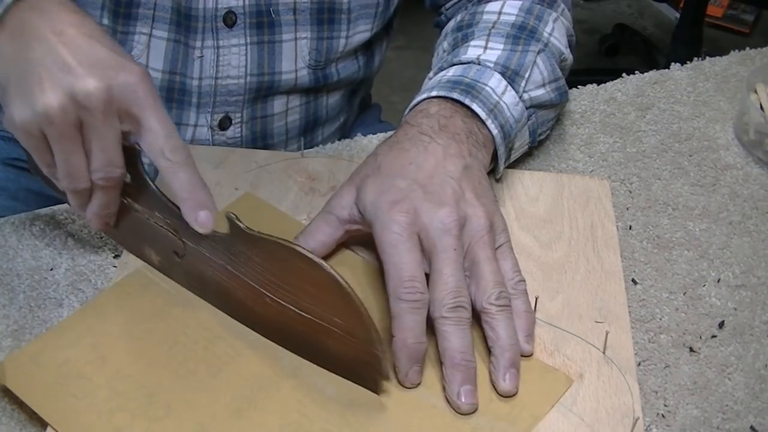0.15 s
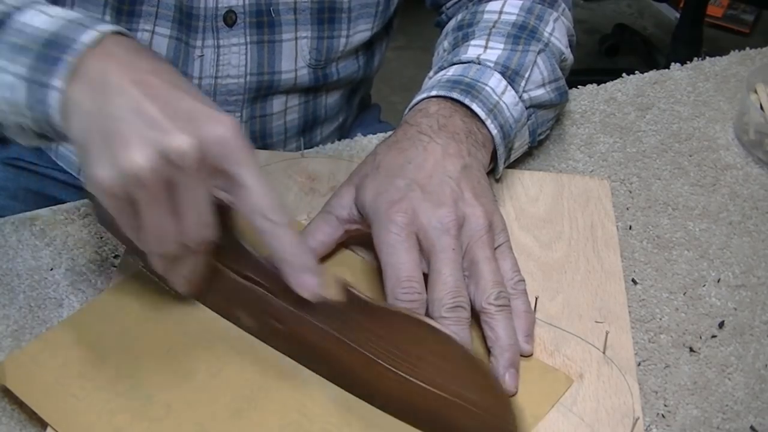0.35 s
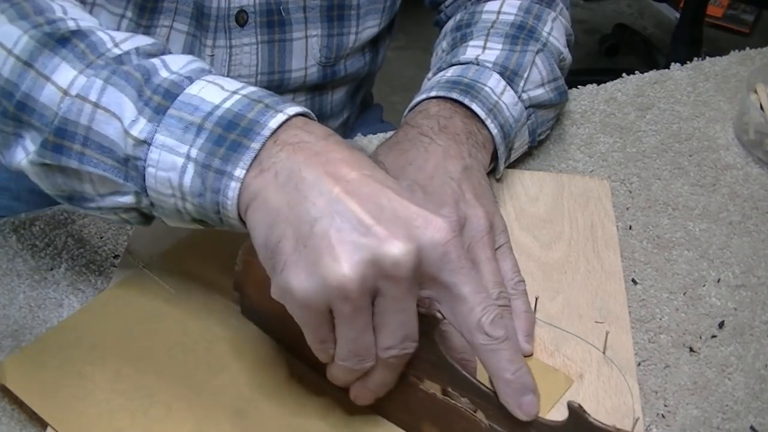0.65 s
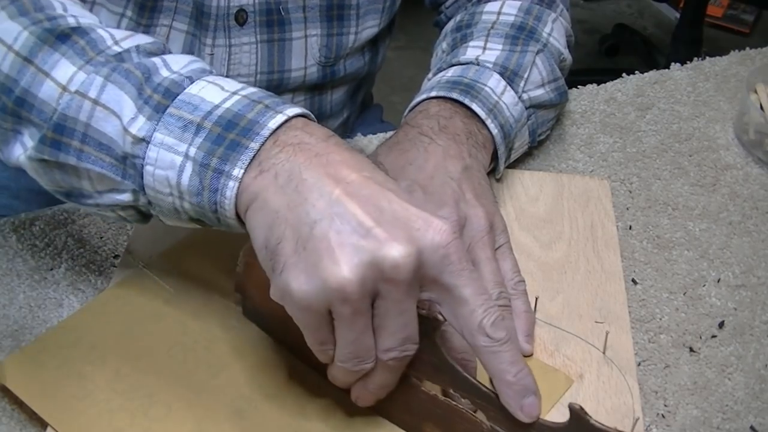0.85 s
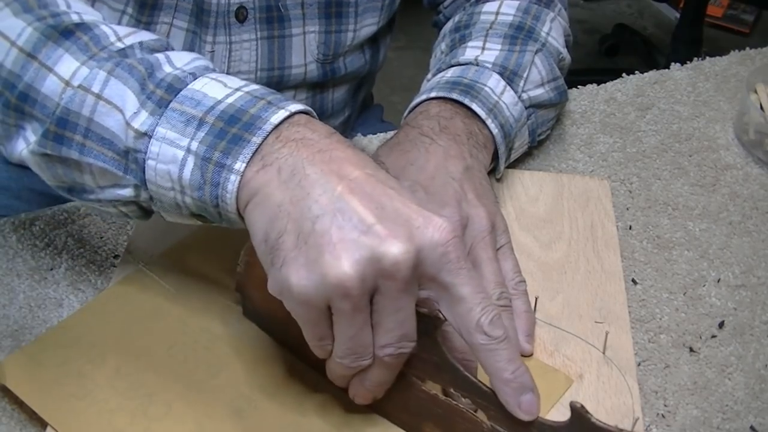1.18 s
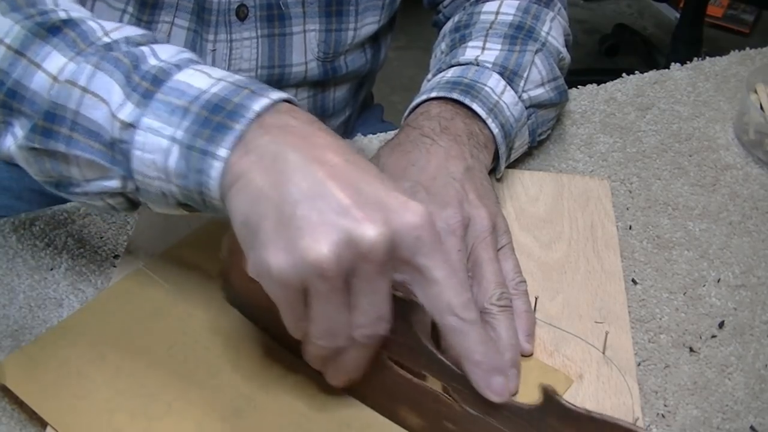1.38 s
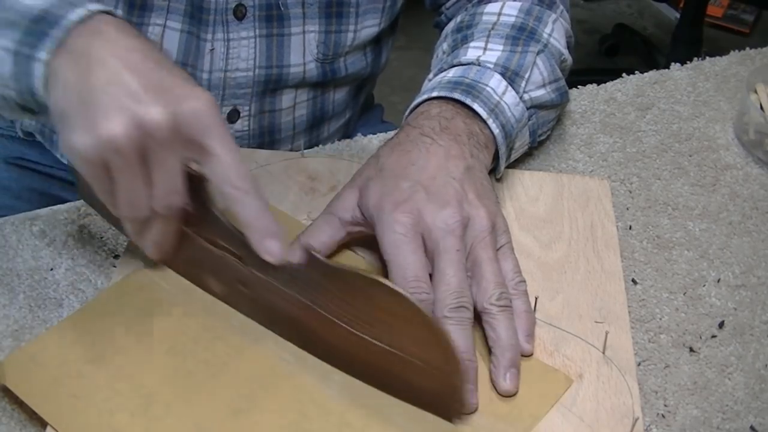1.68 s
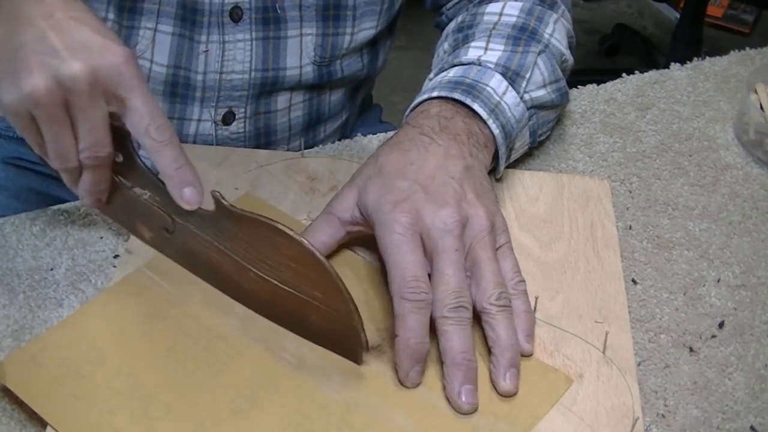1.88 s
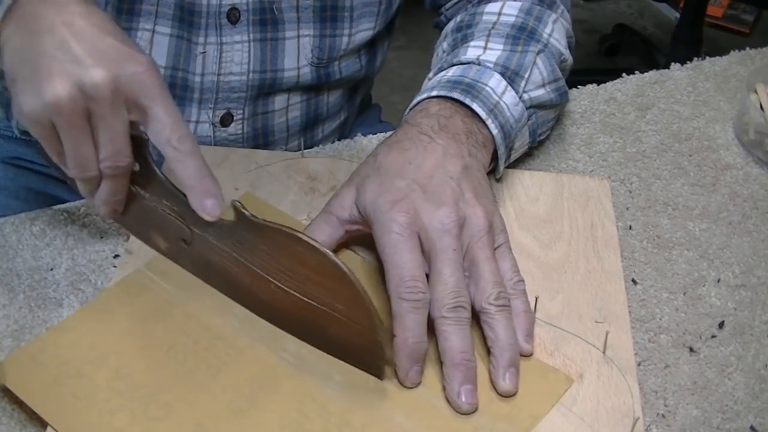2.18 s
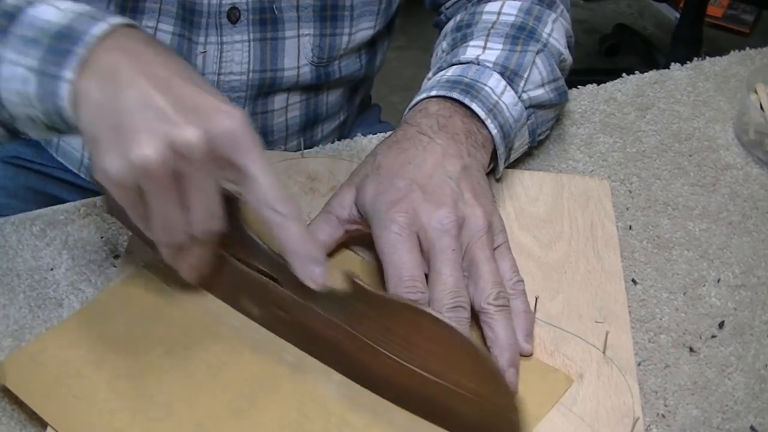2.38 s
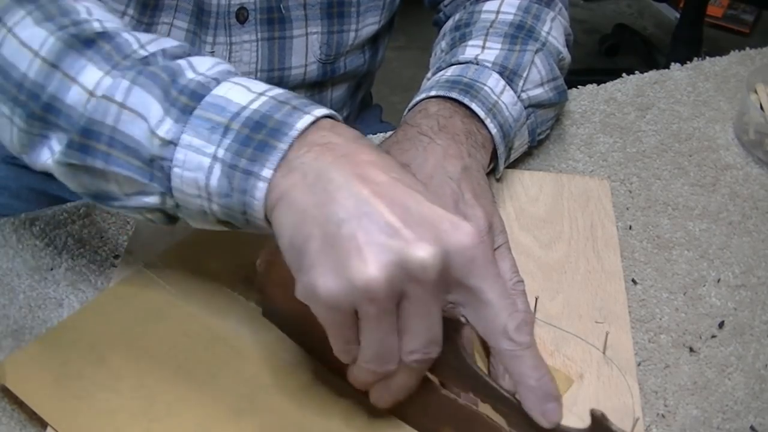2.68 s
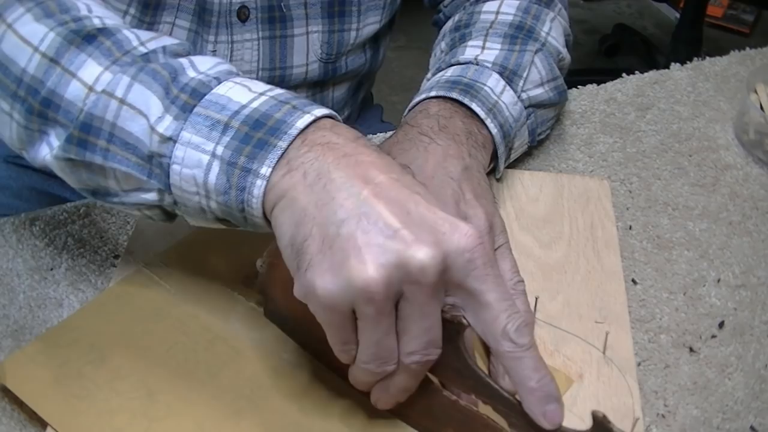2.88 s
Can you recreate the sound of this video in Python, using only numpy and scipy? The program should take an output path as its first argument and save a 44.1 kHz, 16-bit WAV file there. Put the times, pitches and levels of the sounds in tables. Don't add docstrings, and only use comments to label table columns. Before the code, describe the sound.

Wooden edge scraping over sandpaper in three slow, gritty strokes with pauses in a quiet workshop

```python
import sys
import numpy as np
from scipy import signal
from scipy.fft import rfft, irfft
from scipy.io import wavfile
from scipy.ndimage import uniform_filter1d

SR = 44100
rng = np.random.default_rng(int(sys.argv[2]) if len(sys.argv) > 2 else 0)


def materialize(psi):
    bounded = np.clip(np.atleast_2d(psi).T, -1, 1)
    quanta = np.round(bounded * 32767).astype(np.int16)
    wavfile.write(sys.argv[1], SR, quanta)


def undo_db(level):
    steps = np.asarray(level, float) / 20
    return 10 ** steps


N = 134505


def evened(x):
    return x / np.sqrt(np.mean(x ** 2) + 1e-20)


def read_curve(points, hz):
    f, value = np.transpose(points)
    return np.interp(np.log(hz + 1), np.log(f + 1), value)


def resonate(x, hz, width_hz):
    turn = np.exp(2j * np.pi * hz * np.arange(len(x)) / SR)
    r = np.exp(-np.pi * abs(width_hz) / SR)
    return 2 * (turn * signal.lfilter([1 - r], [1, -r], x / turn + 1e-18)).real


def shaped(x, field_db, size=512):
    hz, t, z = signal.stft(x, SR, nperseg=size, noverlap=size - 128)
    z = z * undo_db(field_db(hz[:, None], t))
    return signal.istft(z, SR, nperseg=size, noverlap=size - 128)[1][..., :N]


def patches(bins, frames):
    field = rng.standard_normal((N // 128 + 2, 257))
    field = uniform_filter1d(field, frames, axis=0)
    return evened(uniform_filter1d(field, bins, axis=1)).T


# frequency in Hz, density in dB per Hz.
AIR_SPECTRUM = [(15, -32), (25, -15), (107, -5.5), (174, -6), (352, -8.5), (527, -5.5), (791, -9.5),
                (5520, -22.5), (15800, -31.5)]


def room_air():
    mid_db, side_db = -48 - 3.0, -48 - 22
    spots = patches(8, 20)
    gain = undo_db(read_curve(AIR_SPECTRUM, np.fft.rfftfreq(N, 1 / SR)))
    steady = irfft(rfft(rng.standard_normal((2, N))) * gain, N)
    mid, side = shaped(steady, lambda hz, t: 1.2 * spots[:, :len(t)])
    return undo_db(mid_db) * evened(mid), undo_db(side_db) * evened(side)


# frequency in Hz, level in dB.
HUM_PARTIALS = [(59.2, -57.5), (177.6, -62), (296.1, -69), (419.9, -60.5), (538.3, -66.5)]


def mains_hum():
    waver_db, t = 0.73, np.arange(N) / SR
    waver = evened(uniform_filter1d(rng.standard_normal((len(HUM_PARTIALS), N)), size=4000, axis=1))
    hum = np.zeros(N)
    for (hz, db), w in zip(HUM_PARTIALS, waver):
        hum += undo_db(db + waver_db * w) * np.sqrt(2) * np.sin(2 * np.pi * (hz * t + rng.random()))
    return hum


def workshop():
    whine_hz, whine_width_hz, whine_db = 5340, 90, -76
    air, side = room_air()
    whine = undo_db(whine_db) * evened(resonate(rng.standard_normal(N), whine_hz, whine_width_hz))
    centre = air + mains_hum() + whine
    return np.array([centre + side, centre - side])


# start in seconds, level in dB, pitch in Hz, decay constant in seconds.
HAND_TICKS = [(1.028, -42.5, 5700, 0.0016), (1.2, -57, 6500, 0.01), (1.9, -50, 7700, .008),
              (1.356, -41.5, 4700, 0.0033), (0.15, -36, 9800, 0.003), (0.0084, -45.5, 8000, .005),
              (0.15, -43, 10000, 0.018), (1.155, -56, 1300, 0.027), (1.5, -55, 1100, .02),
              (1.7, -61, 2200, .02), (2.812, -48, 13500, .004), (2.826, -52, 13500, .004),
              (1.382, -41, 10000, .006), (0.66, -54, 1300, 0.025), (2.085, -41, 4400, .008)]


def handling():
    knock_s, knock_db, knock_hz, knock_t60_s, knock_rise_s = 1.105, -32.5, 111, 0.025, 0.00029
    out, t = np.zeros(N), np.arange(2000) / SR
    for s, db, hz, decay_s in HAND_TICKS:
        burst = evened(resonate(rng.standard_normal(2000), hz, 0.4 * hz)) * np.exp(-t / abs(decay_s))
        out[round(s * SR):][:2000] += undo_db(db) * burst
    knock = undo_db(knock_db - 60 * t / knock_t60_s) * np.cos(2 * np.pi * knock_hz * t)
    out[round(knock_s * SR):][:2000] += knock * np.minimum(t / knock_rise_s, 1)
    return out


# time in seconds, scrape level in dB, board load in dB, ring of the piece in dB.
STROKE_CURVES = [
    [(0.07, -58.5, -1, 9), (0.198, -32, 9, 11), (0.32, -22, 3, 7.5), (0.524, -16.5, -4.5, 4.5),
     (0.638, -20.5, 0.5, 3), (0.728, -31, 3, -0.5), (0.77, -40.5, 1, -8), (0.86, -70, -4, -7)],
    [(1.335, -58.5, -6, -13), (1.417, -30, 7.5, -4), (1.539, -18.5, -3.5, 1.5), (1.68, -17.5, -0.5, 3.5),
     (1.801, -17.5, 0.5, -1), (1.945, -24, 6.5, 0.5), (1.985, -34.5, 10.5, -4), (2.05, -56, 1, -14)],
    [(2.05, -49, -18, -8), (2.092, -44, -2, 9), (2.2, -39, 7.5, 10.5), (2.225, -32.5, 6.5, 8),
     (2.254, -28, 9, 6), (2.402, -18.5, 1, 4), (2.54, -18, -6.5, 5), (2.6, -17, -9, 0.5),
     (2.738, -22, 5, 2.5), (2.88, -58.5, 1, -2)],
]
STROKE_REACH = [
    (0.011, 0.87),
    (0.92, 0.017),
    (0.015, 0.88),
]
# centre in seconds, half length in seconds, level in dB.
REST_CREEPS = [
    (.0, .08, -50),
    (1.3, .06, -52),
    (1.15, .05, -57),
    (1.385, .025, -39),
]


def motion():
    t, controls, place = np.arange(N) / SR, np.zeros((3, N)), np.zeros(N)
    creeps_db = [db - 12 * ((t - s) / half_s) ** 2 for s, half_s, db in REST_CREEPS]
    controls[0] = np.max(creeps_db + [t * 0 - 90], axis=0)
    for rows, (start, end) in zip(STROKE_CURVES, STROKE_REACH):
        s, *columns = np.transpose(rows)
        on = (t >= s[0]) & (t <= s[-1])
        stroke = np.array([np.interp(t[on], s, c) for c in columns])
        controls[0, on] = np.maximum(controls[0, on], stroke[0])
        controls[1:, on] = stroke[1:]
        way = np.cumsum(np.sqrt(undo_db(stroke[0])))
        place[on] = start + (end - start) * way / way[-1]
    return *uniform_filter1d(controls, size=400, axis=1), place


def grit():
    grains_per_s, spread_db = 14000, 2.5
    hit, size, sign = rng.random((3, N))
    height = undo_db(-spread_db * np.log(size + 0.015))
    return evened((hit < grains_per_s / SR) * height * np.sign(sign - .5))


# frequency in Hz, density in dB per Hz.
GRIT_SPECTRUM = [(88, -64), (150, -48), (817, -12), (1050, -10), (1710, -12), (2120, -7), (3320, -6.5),
                 (8310, -7), (15800, -18.5)]


def hiss_colour(level_db):
    patchy_db, flicker_db = 1.64, 0.45
    bright_db_per_db, bright_hz = 0.22, 5970
    hollow_db_per_db, hollow_hz, hollow_width_hz = 0.21, 3480, 300
    spots, flicker = patches(4, 9), patches(120, 3)

    def colour(hz, t):
        speed_db = np.interp(t, np.arange(N) / SR, level_db) + 16
        uneven = patchy_db * spots[:, :len(t)] + flicker_db * flicker[:, :len(t)]
        dip = np.exp(-((hz - hollow_hz) / hollow_width_hz) ** 2)
        hollow = hollow_db_per_db * np.maximum(speed_db, -25) * dip
        bright = bright_db_per_db * speed_db * np.log2(hz / bright_hz + 0.28)
        return read_curve(GRIT_SPECTRUM, hz) + uneven + hollow + bright
    return colour


def ringing(drive, modes, place):
    least_width_per_hz = .045
    out = np.zeros(N)
    for hz, width_hz, db, belly, fall_db in modes:
        gain = undo_db(db - abs(fall_db) * abs(place - belly))
        out += gain * evened(resonate(drive, hz, max(width_hz, least_width_per_hz * hz)))
    return out


# frequency in Hz, width in Hz, level in dB, place of strongest drive 0-1,
# fall in dB over the length.
PIECE_MODES = [(2138, 210, -10, 1, 15), (2550, 690, -18.5, 1, 28), (4070, 43, -29.5, 0.06, 10),
               (1610, 40, -13.5, 0.93, 40), (4540, 880, -24, 0.92, -2.5), (5860, 1100, -19.5, 0.16, 19.5),
               (7070, 350, -24.5, 0.1, 1), (8430, 260, -23.5, 0.1, 10), (9630, 330, -24, 0.55, 18)]


def piece_ring(drive, ring_db, place):
    return undo_db(ring_db) * ringing(drive, PIECE_MODES, place)


# frequency in Hz, width in Hz, level in dB, place of strongest drive 0-1,
# fall in dB over the length.
BOARD_MODES = [(561, 38, -20.5, 0.56, 10.5), (509, 16, -23, 0.96, 16), (670, 360, -32, 0.1, 13),
               (925, 62, -24.5, 0.25, 10), (1065, 230, -12, 0.72, 53), (1384, 250, -15.5, 0.64, 42),
               (372, 160, -35.5, 0.4, 0)]


def board_ring(level_db, load_db, place):
    return undo_db(load_db - 0.37 * (level_db + 16.0)) * ringing(grit(), BOARD_MODES, place)


# centre in seconds, half length in seconds, frequency in Hz, width in Hz.
EDGE_CATCHES = [(1.44, .045, 520, 70), (1.86, .07, 553, 45), (1.86, .06, 860, 180), (2.69, .05, 1110, 140),
                (1.79, .04, 3950, 220), (2.455, .025, 3970, 140), (.63, .05, 1150, 280),
                (1.63, .05, 1360, 100), (2.28, .05, 600, 110), (.37, .05, 2520, 130),
                (2.15, .07, 3950, 220), (1.75, .015, 200, 90), (2.5, .02, 150, 70), (2.18, .04, 110, 40),
                (.33, .06, 150, 50), (.45, .17, 2150, 260), (1.57, .06, 2080, 150), (2.545, .04, 2200, 200),
                (2.5, .05, 1090, 90), (1.398, .014, 510, 60), (1.69, .06, 2070, 150),
                (1.96, .03, 1220, 120), (2.27, .05, 950, 100), (2.385, .02, 2620, 150),
                (2.39, .02, 3950, 200), (2.35, .03, 2050, 150), (1.64, .04, 2550, 200),
                (1.51, .03, 1530, 120), (2.16, .06, 2400, 300), (2.18, .05, 1200, 300),
                (1.97, .04, 1650, 60), (2.55, .03, 100, 40), (2.66, .03, 160, 50), (1.83, .025, 130, 60),
                (2.66, .05, 1550, 250), (.24, .04, 2020, 130), (.55, .05, 2200, 150), (.2, .05, 600, 120),
                (.54, .02, 3950, 200), (.75, .025, 520, 60), (2.4, .02, 600, 80)]
EDGE_CATCH_DB = [-9.5, -15, -13.5, -8.5, -10, -10, -21, -12, -19, -14, -13, -28, -26, -22, -29, -19.5, -12,
                 -10.5, -17, 4, -10, -10, -11.5, -16, -13, -13, -14, -19, -12, -10, -18, -34, -36, -34,
                 -12.5, -12, -16, -9.5, -14, -12, -17]


def catches(drive):
    flutter_db = 1.5
    out = np.zeros(N)
    flutter = undo_db(flutter_db * evened(uniform_filter1d(rng.standard_normal(N), size=400)))
    for (s, half_s, hz, width_hz), db in zip(EDGE_CATCHES, EDGE_CATCH_DB):
        span = slice(max(round((s - 2 * half_s) * SR), 0), round((s + 2 * half_s) * SR))
        swell = np.exp(-((np.arange(N)[span] / SR - s) / half_s) ** 2)
        ring = resonate(drive[span], hz, 1.5 * width_hz)
        ring = resonate(ring, hz, 1.5 * width_hz) * flutter[span] * swell
        out[span] += undo_db(db) * evened(ring) * np.sqrt(np.mean(swell ** 2))
    return out


def sanding():
    hiss_db, highpass_hz = 0.5, 90
    wide_from_db, wide_slope = -42, 1.6
    level_db, load_db, ring_db, place = motion()
    colour = hiss_colour(level_db)
    highpass = signal.butter(4, highpass_hz, "high", fs=SR, output="sos")

    def scrape(drive):
        hiss = undo_db(hiss_db) * evened(shaped(drive, colour))
        wood = piece_ring(drive, ring_db, place) + board_ring(level_db, load_db, place)
        caught = catches(signal.lfilter([1], [1, -.9], drive))
        return signal.sosfilt(highpass, undo_db(level_db) * (hiss + wood + caught))

    width = undo_db(wide_slope * np.minimum(level_db - wide_from_db, 0))
    return scrape(grit()), width * scrape(grit())


def room_tail(x):
    t60_s, tail_db, gap_s = 0.17, -15.5, .006
    t = np.arange(SR // 2) / SR
    taps = signal.lfilter([1], [1, -.6], rng.standard_normal(len(t)))
    taps = taps * undo_db(-60 * t / t60_s) * (t > gap_s)
    return undo_db(tail_db) * signal.oaconvolve(x, taps / np.linalg.norm(taps))[:N]


# frequency in Hz, side minus mid in dB.
SIDE_CURVE = [(60, -2), (250, -13), (700, -14), (1500, -16.5), (3000, -12), (5500, -13), (10000, -13),
              (15000, -8)]
# frequency in Hz, left minus right in dB.
LEAN_CURVE = [(60, 0), (240, -2), (950, -1), (3770, -0.9), (9000, -.5), (15000, -3.5)]


def ports(mid, side):
    side = shaped(side, lambda hz, t: read_curve(SIDE_CURVE, hz) + 0 * t)
    half = np.array([.5, -.5])[:, None, None]
    pair = np.array([mid + side, mid - side])
    return shaped(pair, lambda hz, t: half * read_curve(LEAN_CURVE, hz) + 0 * t)


def scene():
    mid, side = sanding()
    return ports(mid + room_tail(mid), side) + handling() + workshop()


# centre in seconds, half length in seconds, upper edge in Hz.
BASS_DROPS = [(.525, .045, 200), (.495, .02, 300), (1.628, .035, 200), (1.585, .015, 150),
              (2.585, .015, 330), (2.56, .03, 50), (2.625, .045, 110), (2.47, .03, 45), (.42, .012, 90),
              (.3, .015, 90), (1.87, .012, 90), (1.8, .012, 150)]
# centre in seconds, half length in seconds, lower edge in Hz.
TREBLE_DROPS = [
    (1.98, .025, 15100),
    (2.035, .02, 15100),
    (2.15, .02, 15050),
    (2.18, .022, 15300),
    (2.285, .008, 15200),
    (1.87, .006, 15500),
]


def band_losses(x, power_db):
    drop_db, edge_hz, edge_db = -40, 15770, -70
    lump_db, lump_hz, lump_from_db = -8, 380, -24
    top_hz, top_db_per_khz = 12100, -1.5
    lumps = np.repeat(patches(2, 12), 2, axis=0)[:513]

    def losses(hz, t):
        drops = sum((hz < below_hz) * (abs(t - s) < half_s) for s, half_s, below_hz in BASS_DROPS)
        drops = drops + sum((hz > above_hz) * (abs(t - s) < half_s) for s, half_s, above_hz in TREBLE_DROPS)
        loud = np.interp(t, np.arange(N) / SR, power_db) > lump_from_db
        frame = np.minimum(np.arange(len(t)), lumps.shape[1] - 1)
        thinning = lump_db * loud * (hz < lump_hz) * np.maximum(lumps[:, frame], 0)
        rolloff = top_db_per_khz * np.maximum(hz - top_hz, 0) / 1000 + edge_db * (hz > edge_hz)
        return drop_db * np.minimum(drops, 1) + thinning + rolloff
    return shaped(x, losses, size=1024)


def roll_off(x):
    return signal.sosfilt(signal.butter(12, 15830, fs=SR, output="sos"), x)


def record(dry):
    limit = 0.65
    power = uniform_filter1d((dry ** 2).mean(0), size=2000)
    power_db = 10 * np.log10(abs(power) + 1e-12)
    limited = limit * np.tanh(dry / limit)
    return roll_off(band_losses(limited, power_db))


dry = scene()
out = record(dry)
materialize(out)
```